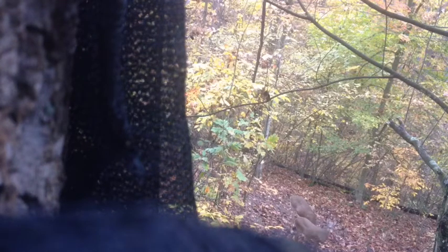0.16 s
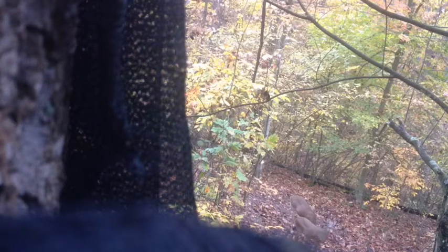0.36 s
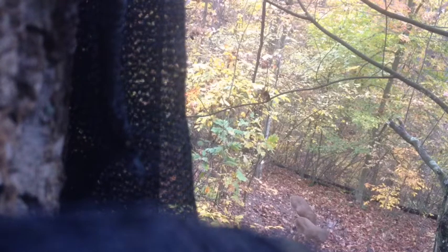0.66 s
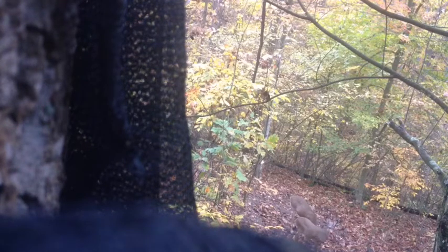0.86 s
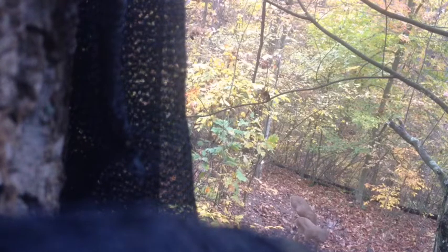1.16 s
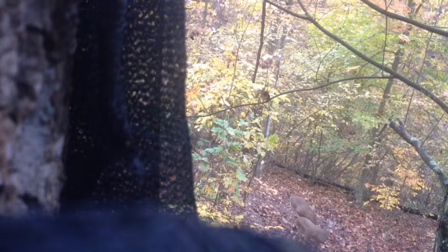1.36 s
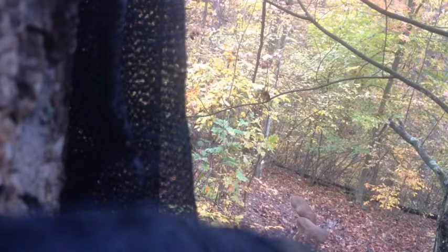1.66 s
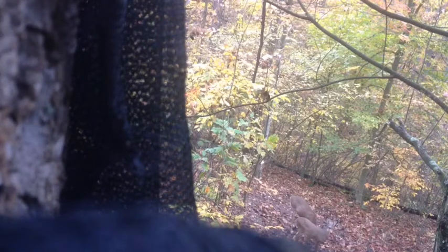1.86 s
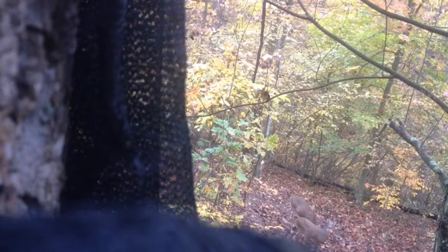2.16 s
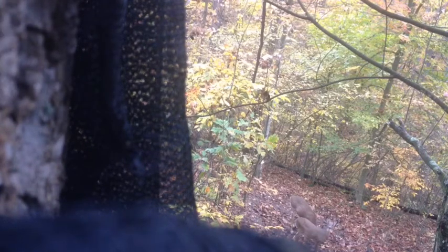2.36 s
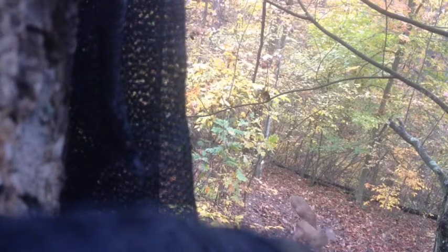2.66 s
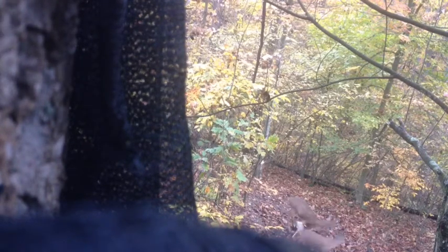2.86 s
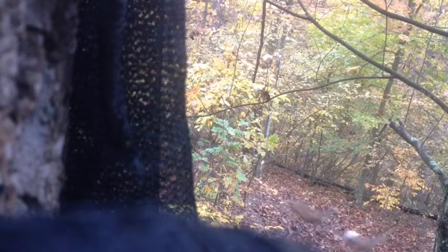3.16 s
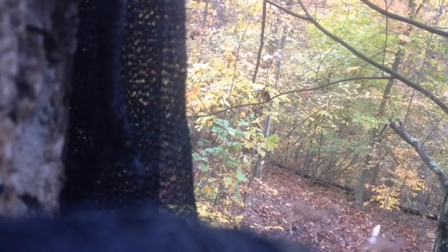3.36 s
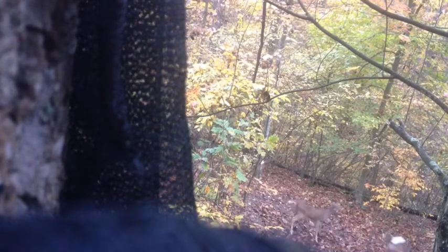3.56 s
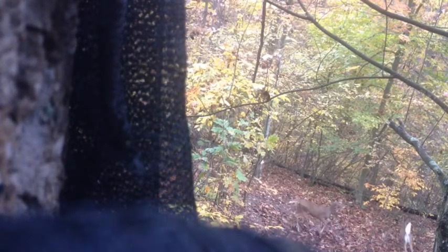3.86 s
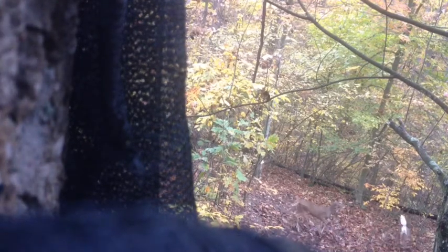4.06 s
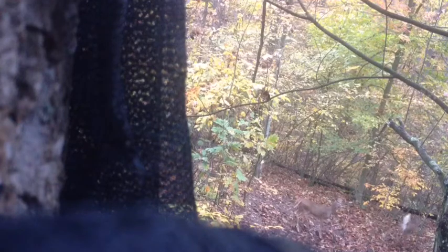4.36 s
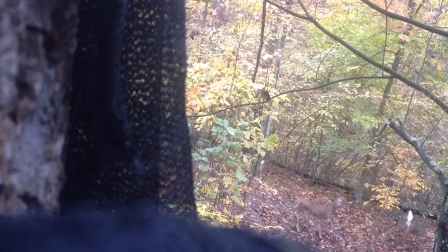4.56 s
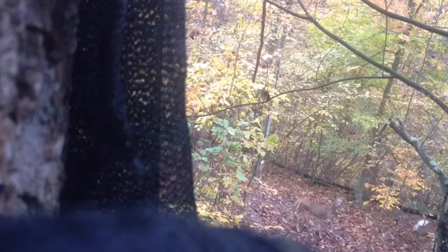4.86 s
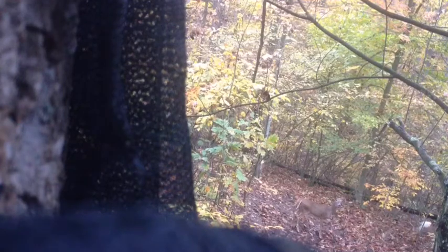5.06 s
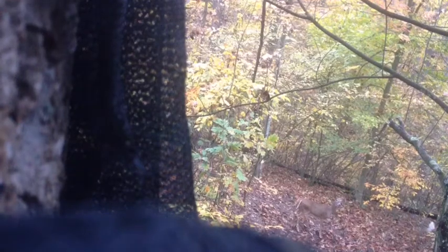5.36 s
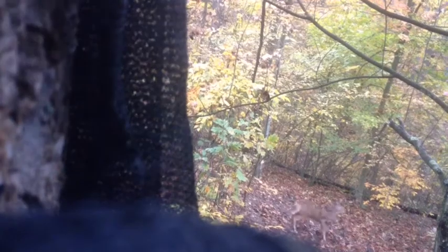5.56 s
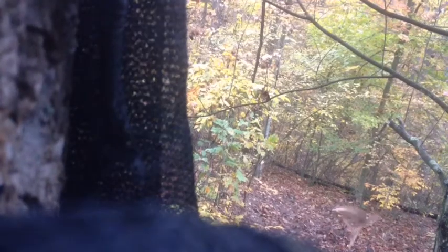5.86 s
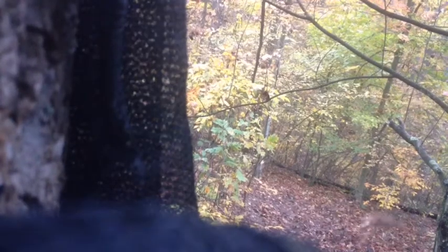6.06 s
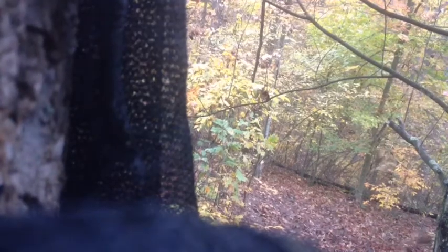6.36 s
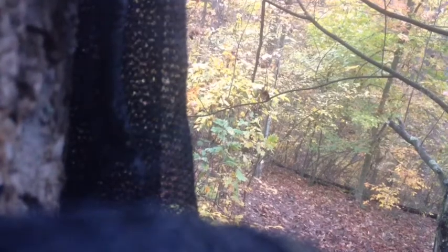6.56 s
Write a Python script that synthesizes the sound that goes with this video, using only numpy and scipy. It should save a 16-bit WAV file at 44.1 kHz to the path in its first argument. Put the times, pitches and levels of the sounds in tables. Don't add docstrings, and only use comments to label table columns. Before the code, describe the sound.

In quiet autumn woods, faint clothing rustles and an arrow's hiss precede a sharp bow crack, a quick thud, and hooves crunching dry leaves.

```python
import sys
import numpy as np
from scipy import signal
from scipy.fft import rfft, irfft, next_fast_len
from scipy.io import wavfile
from scipy.ndimage import uniform_filter1d

SR = 44100
rng = np.random.default_rng(int(sys.argv[2]) if len(sys.argv) > 2 else 0)


def makeup_ratio(level_db):
    decades = np.asarray(level_db, float) / 20
    return 10 ** decades


def transcribe(signal):
    frames = np.atleast_2d(signal).T
    limited = np.clip(frames, -1, 1)
    pcm = np.round(limited * 32767).astype(np.int16)
    wavfile.write(sys.argv[1], SR, pcm)


N = 296425
T = np.arange(N) / SR
STOP_S = 5.2083

# hz, level_db (per Hz)
AIR = [(700, -1), (1500, -2.5), (3000, -4.5), (3800, -1), (5000, -7), (7500, -7.5), (9000, -15),
       (10500, -17.5), (12500, -14), (14500, -13), (15500, -10.5)]
# hz, level_db (per Hz)
LEAF_COLOUR = [(59, -50), (100, -5.5), (177, 1), (347, -8), (551, -2.5), (725, -8.5), (1580, -9.5),
               (1790, -12.5), (1990, -8), (6490, -6.5), (15400, -25.5)]


def evened(x):
    return x / np.sqrt(np.mean(x ** 2) + 1e-20)


def add(mix, s, sound):
    part = mix[round(s * SR):][:len(sound)]
    part += sound[:len(part)]


def high_pass(x, hz):
    return signal.sosfilt(signal.butter(2, hz, "high", fs=SR, output="sos"), x)


def coloured(x, points, lo_hz=0, hi_hz=SR):
    size = next_fast_len(len(x))
    hz = np.fft.rfftfreq(size, 1 / SR) + 1
    f, db = np.transpose(points)
    edges = np.sqrt(1 / (1 + (lo_hz / hz) ** 8) / (1 + (hz / hi_hz) ** 8))
    gain = makeup_ratio(np.interp(np.log(hz), np.log(f), db)) * edges
    return evened(irfft(rfft(x, size) * gain, size)[:len(x)])


def resonate(x, hz, width):
    turn = np.exp(2j * np.pi * np.cumsum(hz * np.ones(len(x))) / SR)
    r = np.exp(-np.pi * width / SR)
    return 2 * (turn * signal.lfilter([1 - r], [1, -r], x / turn)).real


def narrow(x, hz, width):
    peak = signal.iirpeak(hz, hz / width, fs=SR)
    return evened(signal.lfilter(*peak, signal.lfilter(*peak, x)))


def ring(db, hz, t60):
    t = np.arange(SR // 4) / SR
    return makeup_ratio(db - 60 * t / t60) * np.sin(2 * np.pi * hz * t)


def burst(colour, db, rise, t60, tilt_db=0, size=16384):
    noise, t = rng.standard_normal(size), np.arange(size) / SR
    tilted = [(f, level + tilt_db * np.log2(f / 4000)) for f, level in colour]
    return makeup_ratio(db - 60 * t / t60) * (1 - np.exp(-t / rise)) * coloured(noise, tilted)


def stroke(s, db, rise, fall, hold=0):
    away = np.maximum((s - hold - T) / rise, (T - s - hold) / fall)
    return makeup_ratio(db - 20 * np.clip(away, 0, 6))


def whistle():
    # start_s, length_s, from_hz, to_hz, peak_db
    flights = [
        (5.2055, .0031, 2400, 2850, -10),
        (5.2084, .0012, 3300, 4600, -3),
        (5.2088, .004, 5600, 6000, -5),
        (5.2098, .0022, 4500, 4300, -9),
        (5.2123, .0023, 3900, 4500, -8),
    ]
    out = np.zeros(N)
    for s, length, from_hz, to_hz, db in flights:
        flying = s + length / 2 < STOP_S
        start_db, end_db = (db - 8.5, db) if flying else (db, db - 10)
        count = round(length * SR)
        turns = np.cumsum(np.linspace(from_hz, to_hz, count)) / SR
        shape = makeup_ratio(np.linspace(start_db, end_db, count)) * signal.windows.tukey(count, .3)
        add(out, s, shape * np.sin(2 * np.pi * turns))
    return out


def crack():
    # start_s, rms_db, rise_s, t60_s
    blows = [
        (5.188, -37, 0.0013, 0.13),
        (5.201, -31.5, 0.0021, 0.15),
        (5.2084, -17, 0.00039, 0.11),
        (5.2085, -24, 0.004, 0.21),
        (5.2182, -11, 0.00036, 0.0064),
        (5.2227, -10.5, 0.00018, 0.0024),
    ]
    # start_s, rms_db
    trunks = [(5.228, -19.5), (5.2393, -22.5), (5.249, -26.5), (5.266, -27), (5.281, -38), (5.298, -38),
              (5.341, -45), (5.355, -55)]
    # start_s, rms_db, rise_s, t60_s
    late_hiss = (5.5, -37, 0.2, 0.26)
    # hz, level_db (per Hz)
    colour = [(35, -58.5), (60, -41), (130, -33.5), (327, -2), (452, 1.5), (584, -4.5), (1550, -6.5),
              (1700, -14.5), (3030, 0.5), (4200, -10), (4610, -5.5), (5810, -5.5), (8420, -5),
              (9910, -14.5), (13100, -10), (15400, -13.5)]
    out = np.zeros(N)
    echo_rise_s, echo_t60_s = 0.0013, 0.017
    for s, *blow in blows + [(*echo, echo_rise_s, echo_t60_s) for echo in trunks] + [late_hiss]:
        add(out, s, burst(colour, *blow))
    return out


def limbs_and_riser():
    # hz, peak_db, t60_s
    limbs = [(200, -34.5, 0.3), (275, -25, .08), (441, -24.5, 0.1), (600, -23, .05), (8350, -26, 0.046),
             (13140, -26, 0.02)]
    # hz, level_db, t60_s
    riser = [(1075, -1.5, .12), (2530, -3, .1), (3510, -8, .12), (4730, -2, .15), (5350, -13.5, .12),
             (6880, -3, .07), (8200, -5, .16), (8457, -5.5, .1), (11100, -6, .05), (11720, -5.5, .05),
             (12900, -6, .04), (14650, -13.5, .05) ]
    riser_db = -31
    out = np.zeros(N)
    shake = rng.standard_normal(400) * np.exp(-np.arange(400) / 150)
    shake /= np.linalg.norm(shake)
    for hz, db, t60 in limbs + [(hz, db + riser_db, t60) for hz, db, t60 in riser]:
        add(out, STOP_S, signal.fftconvolve(ring(db, hz, t60), shake))
    return out


def rattle():
    # hz, width_hz, level_db, t60_s
    fittings = [(215, 85, -45, 0.59), (1080, 220, -37, 0.27), (2200, 810, -31, .15), (3500, 510, -27, .19),
                (4760, 600, -19, 0.13)]
    sag_per_s = 0.46
    t, out = np.arange(SR // 2) / SR, np.zeros(N)
    uneven = evened(uniform_filter1d(rng.standard_normal(len(t)), size=300))
    clumps = makeup_ratio(4.9 * uneven) * rng.standard_normal(len(t))
    for hz, width, db, t60 in fittings:
        buzz = evened(resonate(clumps, hz * (1 - sag_per_s * t), width))
        add(out, STOP_S, makeup_ratio(db - 60 * t / t60) * buzz)
    return out


def blows():
    # start_s, peak_db, hz
    thuds = [(2.295, -48.5, 468), (2.491, -52, 196), (2.664, -49, 183), (2.691, -49.5, 210),
             (3.165, -40.5, 170), (3.49, -56, 368), (3.51, -54, 610), (4.069, -49, 196),
             (5.473, -30.5, 203), (5.499, -41, 197), (5.523, -42.5, 265), (6.004, -41, 441),
             (6.018, -39.5, 151), (6.178, -40.5, 441), (6.304, -39, 171), (6.558, -51, 560),
             (6.679, -50, 540)]
    # start_s, peak_db, hz
    slaps = [(5.2188, -4, 6000), (5.2221, -5, 6000), (6.1822, -30, 3000), (6.2069, -28, 4500),
             (6.5856, -31, 4500), (6.5655, -32, 3000), (3.257, -40, 3500), (5.4279, -37, 2500),
             (6.3035, -32, 5000), (6.3105, -31, 3500), (6.4318, -38, 2500), (5.4625, -36, 3000),
             (5.4675, -37, 4000)]
    # start_s, peak_db, hz, t60_s
    struck_parts = [(5.423, -41, 602, 0.011), (5.43, -36.5, 593, 0.012), (5.438, -46, 700, 0.025),
                    (5.4452, -20, 820, 0.0053), (5.4472, -17.5, 770, 0.0051), (5.446, -35.5, 2370, 0.035),
                    (5.4508, -29, 497, 0.0066), (5.452, -32, 215, 0.04), (5.464, -38, 1430, 0.024),
                    (5.471, -37, 1310, 0.014), (5.479, -35, 1260, 0.021), (5.485, -36, 1330, .015),
                    (5.446, -40, 7340, 0.018), (5.518, -47, 500, 0.021), (5.529, -43, 900, 0.018),
                    (6.1822, -30.5, 1398, 0.0044), (6.184, -40, 900, 0.018), (6.2071, -29, 2620, 0.0019),
                    (6.207, -46, 800, 0.012), (6.432, -42, 1610, 0.015),
                    (5.191, -39, 13000, .015), (5.2084, -8.5, 3260, 0.0077), (5.4453, -40, 10800, .008),
             (5.4453, -39, 14500, .01), (4.065, -47.5, 112, 0.085), (5.2188, -13, 8200, .004),
             (5.2188, -18, 11000, 0.0035), (5.2221, -14, 8300, 0.0022), (5.243, -31.5, 1150, 0.043),
             (5.266, -32, 3450, .04), (5.343, -49, 3100, .02), (5.4453, -29, 1660, 0.005),
             (5.355, -47, 3080, 0.03), (5.367, -47, 3050, .035), (6.065, -42, 2830, 0.044),
             (6.065, -46, 1000, 0.052), (6.1824, -38, 3100, 0.0037), (6.2068, -39, 4600, .003),
             (6.09, -40.5, 2920, .015), (1.7326, -54, 670, .015), (3.2, -66, 1600, 0.018),
             (6.1829, -26, 1600, 0.0023)]
    out = np.zeros(N)
    thud_t60_s, slap_t60_s = 0.043, .0012
    dull = [(*thud, thud_t60_s) for thud in thuds]
    bare = [(*slap, slap_t60_s) for slap in slaps]
    for s, *blow in dull + bare + struck_parts:
        add(out, s, -ring(*blow))
    return out


def short_bright_rings():
    # start_s, peak_db, hz
    glints = [(5.189, -37, 700), (5.189, -46, 2200), (5.19, -38, 3700), (5.2087, -18, 7240),
              (5.2092, -24, 12300), (5.2183, -21, 13300), (5.2183, -30.5, 11200), (5.2176, -24, 1650),
              (5.2431, -26.5, 1135), (5.2476, -42, 11000), (5.279, -42, 343), (5.2805, -36, 7650),
              (5.2815, -36, 5430), (5.2985, -42, 1550), (5.3199, -46, 4570), (5.3369, -49, 7240),
              (5.3389, -56, 9390), (5.3394, -44, 3240), (5.3414, -56, 1550), (5.3538, -49, 7670),
              (5.3548, -46, 5050), (5.3583, -52, 6460), (5.3962, -62, 6200)]
    # start_s, peak_db, hz
    clatter = [(5.4451, -40, 10420), (5.4461, -42, 12750), (5.4471, -43, 6100), (5.4511, -45, 4850),
               (5.4541, -50, 11800), (5.482, -51, 12230), (5.496, -56, 10250), (5.5005, -49, 5590),
               (5.5145, -60, 12230), (5.5589, -50, 4910), (5.5589, -55, 11800), (5.5594, -53, 7600),
               (5.5594, -57, 12750), (5.5594, -57, 9000), (5.5644, -63, 9900), (5.5668, -51, 4130),
               (5.5868, -66, 13610), (5.6606, -53, 1890), (5.6846, -72.5, 8960), (5.7444, -62, 3270)]
    # start_s, peak_db, hz
    clicks = [(2.574, -49, 2850), (3.257, -50, 3500), (5.4279, -39, 2870), (5.466, -44, 2390),
              (5.486, -52, 3000), (2.3861, -51, 3190), (2.4599, -43, 2770), (2.6799, -56, 2760),
              (2.7807, -51, 6460), (3.1638, -50, 7860), (3.1643, -45.5, 3700), (3.2736, -50, 4130),
              (3.289, -52, 2570), (5.8148, -44, 4220), (5.8143, -53, 11280), (5.8447, -55, 7840),
              (6.0627, -42.5, 1670), (6.0632, -43.5, 6000), (6.0632, -38.5, 3970), (6.1226, -52, 4580),
              (6.1231, -45, 430), (6.1361, -50, 7490), (6.158, -51, 8350), (6.1819, -51, 4100),
              (6.2717, -47, 9730), (6.2722, -39, 6460), (6.3097, -39, 7410), (6.3097, -38.5, 2460),
              (6.3097, -39, 3800), (6.3391, -47, 430), (6.4315, -48, 2500), (6.5262, -48, 5940),
              (6.5267, -44, 860), (6.5651, -49, 1300), (6.5661, -42, 2780), (6.5661, -42, 6500),
              (6.5676, -40, 2070), (6.582, -43.5, 600), (6.586, -43, 1640), (6.586, -44, 6290),
              (6.613, -49, 780), (6.6564, -45, 4580), (6.6688, -39.5, 345), (6.6838, -47, 6290)]
    out = np.zeros(N)
    for rows, t60_s in (glints, 0.018), (clatter, 0.019), (clicks, 0.016):
        for s, db, hz in rows:
            add(out, s, ring(db, hz, t60_s))
    return out


def hooves():
    # start_s, peak_db, t60_s, treble_tilt_db (per octave)
    steps = [(5.4437, -27.5, 0.24, 3), (5.812, -34.5, 0.19, -1), (5.97, -37.5, 0.14, -3.5),
             (6.0616, -37.5, 0.2, -0.5), (6.267, -37, .05, 3), (6.2726, -30.5, 0.11, 7),
             (6.303, -27, 0.15, 0), (6.4315, -35, 0.14, -0.5), (6.556, -33, 0.11, 1),
             (6.565, -29, 0.097, -1), (6.5852, -29.5, 0.14, 0.5)]
    crunch = np.zeros(N)
    for s, db, t60, tilt_db in steps:
        add(crunch, s, burst(LEAF_COLOUR, db + 12.0, .0028, t60, tilt_db))
    uneven = evened(uniform_filter1d(rng.standard_normal(N), size=130))
    return makeup_ratio(-24.0) * crunch * makeup_ratio(1.1 * uneven)


def gear_and_twigs():
    # start_s, peak_db, hz
    dull = [(2.299, -43, 791), (2.778, -42, 1040), (3.133, -47, 1340), (3.166, -42.5, 900),
            (5.427, -39, 1190), (5.455, -36, 860), (5.653, -50.5, 996), (5.713, -51, 633),
            (6.089, -53, 1260), (6.639, -49, 638)]
    # start_s, peak_db, hz
    ticks = [(1.1694, -50, 2500), (1.533, -44.5, 2330), (2.386, -47, 1560), (2.574, -38, 3920),
             (2.6623, -44, 2790), (2.772, -37, 2420), (2.957, -47, 2480), (3.1637, -43, 1600),
             (3.257, -40, 2500), (3.329, -45, 1560), (4.0577, -47, 2420), (4.2568, -47.5, 1990),
             (4.2774, -47, 4200), (5.4279, -37, 2350), (5.91, -51, 2370), (5.9715, -40.5, 2350),
             (6.0625, -46, 2803), (6.158, -39, 1560), (6.3042, -35, 3750), (6.565, -38, 2030),
             (6.5854, -45, 3000)]
    # start_s, peak_db, hz
    bright = [(0.8619, -65, 4640), (1.732, -43, 7300), (2.5742, -37, 6900), (2.5742, -37, 12500),
              (2.672, -45, 6500), (3.164, -41, 4740), (3.2575, -56, 4570), (5.8148, -35, 6080),
              (6.137, -44, 6200), (6.157, -55, 8500), (6.2414, -41, 6200), (6.273, -28.5, 8040),
              (6.302, -37, 7280)]
    # hz, level_db (per Hz)
    twig = [(300, -20), (1500, -8), (3500, -6), (7000, 2.5), (10000, -12), (13000, -9), (15500, -11)]
    out = np.zeros(N)
    for rows, t60_s, bare in (dull, 0.017, 0.19), (ticks, 0.009, 0.28), (bright, 0.0074, .42):
        for s, db, hz in rows:
            click = burst(twig, db, 1e-4, 0.97 * t60_s, size=2048)
            add(out, s, (1 - bare) * ring(db, hz, t60_s)[:2048] + bare * click)
    return out


def trees(x):
    t = np.arange(SR // 2) / SR
    tail = rng.standard_normal(len(t)) * makeup_ratio(-60 * t / .5) * (1 - np.exp(-t / 0.0053))
    tail = signal.lfilter([1], [1, -.6], tail)
    return signal.fftconvolve(x, tail / np.linalg.norm(tail))[:N]


def grains(per_s, spread_db):
    size = makeup_ratio(spread_db * np.minimum(rng.exponential(1, N), 3)) * (rng.random(N) < per_s / SR)
    return evened(size * rng.standard_normal(N)) + 1.45 * rng.standard_normal(N)


def crackle(count=10):
    size = makeup_ratio(3.0 * np.minimum(rng.exponential(1, N), 2)) * (rng.random(N) < 500 / SR)
    kind, t = rng.integers(0, count, N), np.arange(600) / SR
    out = np.zeros(N)
    for k, hz in enumerate(np.geomspace(750, 9000, count)):
        snap = np.sqrt(hz) * np.exp(-t * hz / 6) * np.sin(2 * np.pi * hz * t)
        out += signal.oaconvolve(size * (kind == k), snap)[:N]
    return evened(out)


def patchy(x):
    z = signal.stft(x, nperseg=256)[2]
    patches = uniform_filter1d(rng.standard_normal(z.shape), size=4, axis=0)
    patches = evened(uniform_filter1d(patches, size=9, axis=1))
    return evened(signal.istft(z * makeup_ratio(2.5 * patches), nperseg=256)[1][:N])


def rustle(strokes, law, colour, crumple):
    hold, body_db, fizz_db, body_slope_db, fizz_slope_db = law
    power = np.array([stroke(*row[:4], hold) ** 2 for row in strokes])
    crisp = np.array(strokes)[:, 4] @ power / power.sum(axis=0)
    body = makeup_ratio(body_db + body_slope_db * crisp) * coloured(crumple, colour, hi_hz=1650)
    middle = coloured(crumple, colour, lo_hz=1880, hi_hz=8600)
    fizz = makeup_ratio(fizz_db + fizz_slope_db * crisp) * coloured(crumple, AIR, lo_hz=8500)
    return np.sqrt(power.sum(axis=0)) * (body + middle + fizz)


def leaping_leaves(snaps):
    # peak_s, level_db, rise_s, fall_s, crispness
    strokes = [(5.432, -50.5, 0.017, 0.049, -0.32), (5.47, -52.5, .004, 0.285, 0),
               (5.46, -63, .01, .2, 1.2), (5.565, -56, .015, 0.1, 1), (5.84, -57.5, 0.033, 0.18, -1.4),
               (6.0, -56.5, 0.091, 0.22, -1.1), (6.078, -53.5, 0.034, 0.82, -0.45),
               (6.16, -58.5, 0.18, 0.53, 0.6), (6.31, -53, 0.19, .22, 1.1), (6.46, -57, .08, 0.47, -0.15),
               (6.54, -55.5, 0.15, 0.24, 0.34), (6.66, -54, 0.26, 0.35, 0.72)]
    # half_hold_s, body_db, fizz_db, then body_db and fizz_db per unit of crispness
    law = (-0.0358, -1, -6, -2.5, 9.5)
    crumple = patchy(grains(2500, 1.9) + makeup_ratio(-15.0) * snaps)
    return rustle(strokes, law, LEAF_COLOUR, crumple)


def clothing(fabric):
    # peak_s, level_db, rise_s, fall_s, crispness
    rubs = [(2.4, -70, .05, .2, -0.89), (2.475, -54, .09, .03, -0.24), (2.55, -70, .05, .04, 1),
            (2.63, -64, .02, .04, .9), (2.672, -55.5, .06, .015, -0.1)]
    tugs = [(2.778, -55.5, .07, .045, 0)]
    settling = [(2.97, -67, 0.37, 0.19, 0.25), (3.13, -57, 0.015, 0.12, -0.38),
                (3.16, -54, 0.053, 0.065, 0.033), (3.265, -60.5, 0.022, 0.17, -0.21),
                (3.5, -61.5, 0.059, 0.13, -2.1), (3.54, -59.5, .1, 0.12, 0.57),
                (3.68, -60.5, 0.051, 0.32, -0.28), (4.068, -58, 0.015, 0.11, 0.42),
                (4.286, -62, 0.076, 0.12, 0.49), (4.47, -69.5, 0.36, 0.16, 0.53)]
    # half_hold_s, body_db, fizz_db, then body_db and fizz_db per unit of crispness
    rub_law = (.02, -7.5, -17, -1, 17)
    tug_law = (.012, 0, -17, 0, 0)
    settling_law = (0, -4, -7.5, -3.5, 4)
    # hz, level_db (per Hz)
    rub_colour = [(88, -31), (150, -4), (201, 3.5), (274, -26), (489, -4), (654, -8.5), (1310, -8.5),
                  (1660, -15.5), (2740, -4.5), (4630, -13.5), (6190, -7), (8610, -20), (15400, -11)]
    tug_colour = [(59, -42), (100, -7), (797, -3), (1020, -3), (2130, -11), (2420, -6), (3180, -11),
                  (6620, -10), (15000, -37)]
    settling_colour = [(88, -27), (150, -3.5), (518, -3), (1130, -9), (1600, -9), (2220, -13.5),
                       (2400, -8.5), (3460, -12.5), (6320, -11.5), (15400, -31.5)]
    out = rustle(rubs, rub_law, rub_colour, fabric)
    out += rustle(tugs, tug_law, tug_colour, fabric)
    return out + rustle(settling, settling_law, settling_colour, fabric)


def folds(crumple):
    # peak_s, level_db, fade_s, hz, width_hz
    creases = [(2.392, -65, .015, 1450, 700), (2.435, -61, .03, 2850, 1000), (2.475, -60, .04, 2900, 1200),
               (2.62, -62, .012, 6150, 900), (2.65, -63, .04, 2950, 1300), (2.69, -60, .012, 2700, 1600),
               (2.775, -62, .035, 1050, 600), (2.775, -63, .035, 2500, 800), (3.145, -61, .04, 1550, 900),
               (3.185, -64, .04, 1600, 1100), (3.285, -68, .05, 1400, 1000), (5.845, -61, .06, 2450, 1300),
               (5.49, -55, .05, 3000, 2500), (6.19, -55, .015, 800, 800), (5.817, -52, .008, 5500, 5000)]
    hold_s = .006
    out = np.zeros(N)
    for s, db, fade, hz, width in creases:
        span = slice(round((s - .25) * SR), round((s + .25) * SR))
        out[span] += narrow(crumple[span], hz, width) * stroke(s, db, fade, fade, hold_s)[span]
    return out


def slide():
    # time_s, level_db, shaft_resonance_hz
    path = [(1.8, -85, 2540), (2.0, -68.5, 2560), (2.06, -71, 2560), (2.1, -66, 2610), (2.17, -65.5, 2660),
            (2.22, -65, 2600), (2.26, -69, 2600), (2.33, -65.5, 2610), (2.41, -67, 2700)]
    shaft = [(1, 110, 5.5, -18), (1.2, 110, 1.5, 3), (1.29, 90, -15, 4), (2.13, 250, 1, 3.5),
             (2.32, 200, -10, 9), (2.95, 160, -3, 4)]
    slip_s, slip_length_s = 2.25, 0.027
    s, db, hz = np.transpose(path)
    inside = uniform_filter1d(((T > s[0]) & (T < s[-1])) * 1., size=200)
    gain = makeup_ratio(np.interp(T, s, db)) * np.clip(inside, 0, 1).round(6)
    moving = gain > 0
    rub, pitch = grains(3000, 3.8)[moving], np.interp(T, s, hz)[moving]
    slipped = np.clip((T[moving] - slip_s) / slip_length_s, 0, 1)
    tube = sum(makeup_ratio(level_db + change_db * slipped) * evened(resonate(rub, multiple * pitch, width))
               for multiple, width, level_db, change_db in shaft)
    out = np.zeros(N)
    out[moving] = evened(tube)
    return gain * out


def breeze():
    # time_s, level_db
    swells = [
        (0.0, -66.5),
        (1.91, -63.5),
        (3.72, -64.5),
        (3.9, -64.5),
        (5.3, -66.5),
        (5.88, -60),
        (6.72, -51),
    ]
    s, db = np.transpose(swells)
    gust = stroke(4.9, -60.5, .15, 0.18)
    stir = np.hypot(makeup_ratio(np.interp(T, s, db)), gust)
    return makeup_ratio(-3.0) * stir * coloured(rng.standard_normal(N), AIR, lo_hz=900)


def rumble():
    # hz, level_db (per Hz)
    spectrum = [(15, -80.5), (25, -41.5), (54, -42), (75, -22.5), (107, -14), (186, -4), (270, -10.5),
                (433, -13.5), (517, -12.5), (681, -16), (1200, -15.5), (1560, -46.5), (2640, -120)]
    return makeup_ratio(-63.5 - 4.0) * coloured(rng.standard_normal(N), spectrum, hi_hz=900)


def drones():
    # hz, width_hz, level_db, start_s
    bands = [(176, 45, -79.5, 0.59), (3750, 160, -80.5, -0.5)]
    out = np.zeros(N)
    for hz, width, db, start in bands:
        fade_in = np.clip((T - start) / 0.17 + .5, 0, 1)
        out += makeup_ratio(db) * fade_in * narrow(rng.standard_normal(N), hz, width)
    return out


def motors():
    # hz, level_db, start_s, share_of_load
    engines = [(89.5, -88, -1.5, 0.94), (176, -77.5, 0, 1), (205, -71, 3.5, 0.014)]
    # time_s, load_db
    load = [
        (0, 2),
        (2.1, -2),
        (2.45, -8),
        (3.8, -4),
        (4.3, 2.5),
        (5.2, 4.5),
        (5.6, -5.5),
    ]
    sag_per_s, beat_db, beat_hz = 0.0019, 0, 0.38
    load_db = np.interp(T, *np.transpose(load))
    waver = 0.00055 * np.sin(2 * np.pi * 1.1 * T) - sag_per_s * T ** 2 / 2
    out = np.zeros(N)
    for hz, db, start, share in engines:
        beat = beat_db * np.sin(2 * np.pi * beat_hz * T + hz)
        gain = makeup_ratio(db + share * load_db + 3.0 + beat) * np.clip((T - start) / .5, 0, 1)
        out += gain * np.sin(2 * np.pi * hz * (T + waver))
    return out


def scene():
    bow = high_pass(whistle() + crack() + limbs_and_riser() + rattle(), 140)
    impacts = blows() + short_bright_rings() + hooves() + gear_and_twigs()
    echoes = makeup_ratio(-27.0) * trees(bow) + makeup_ratio(-16) * trees(impacts)
    snaps = crackle()
    fabric = patchy(grains(4000, 1.6) + makeup_ratio(-14.5) * snaps)
    handling = clothing(fabric) + folds(fabric) + slide()
    close = bow + impacts + echoes + leaping_leaves(snaps) + handling
    background = breeze() + rumble() + drones() + motors()
    return (high_pass(close, 150) + background)[None]


def low_pass(x):
    return signal.sosfilt(signal.butter(12, 15570, fs=SR, output="sos"), x)


def record(dry):
    edge = signal.firwin(151, 15400, window=("kaiser", 5), fs=SR)
    mix = signal.oaconvolve(dry, edge[None], "same")
    return low_pass(mix)


dry = scene()
out = record(dry)
transcribe(out)
```